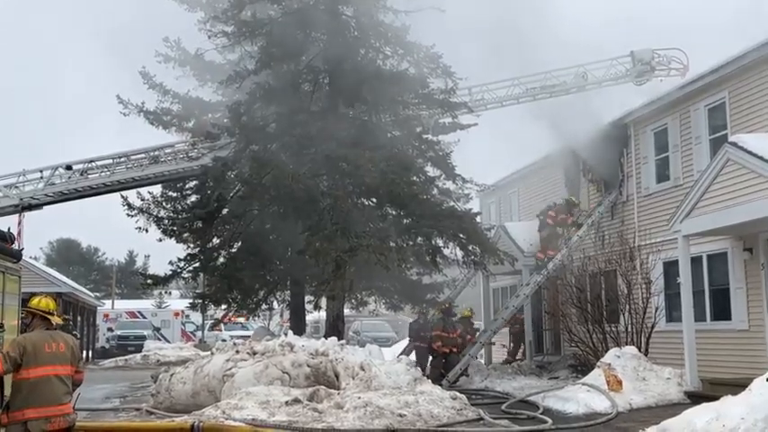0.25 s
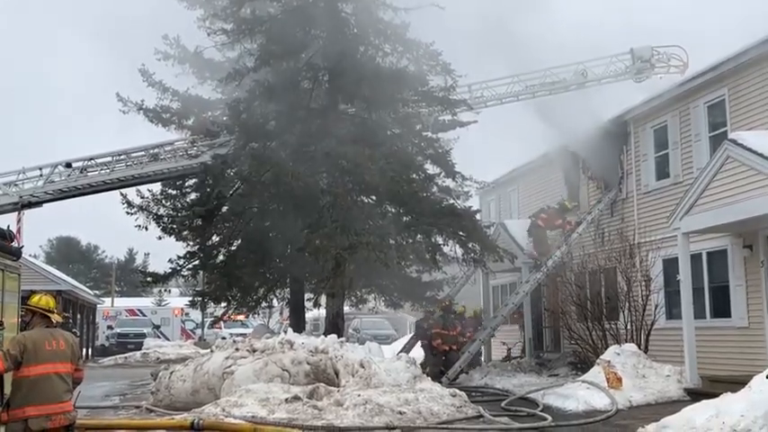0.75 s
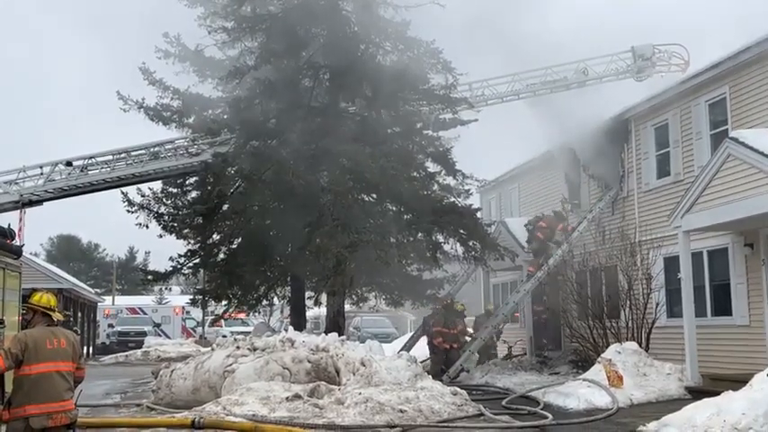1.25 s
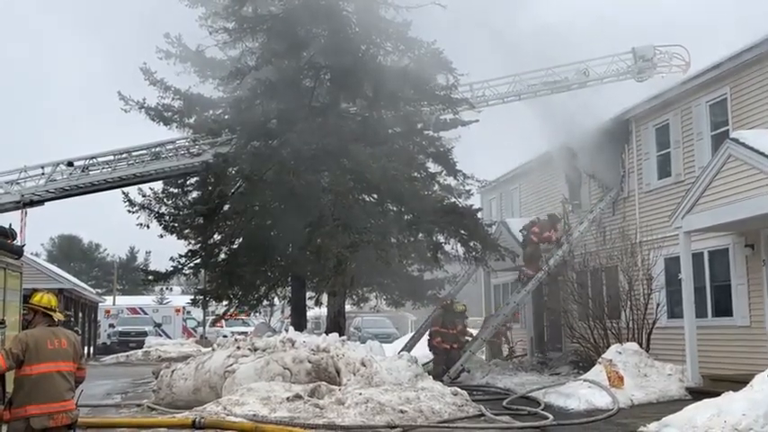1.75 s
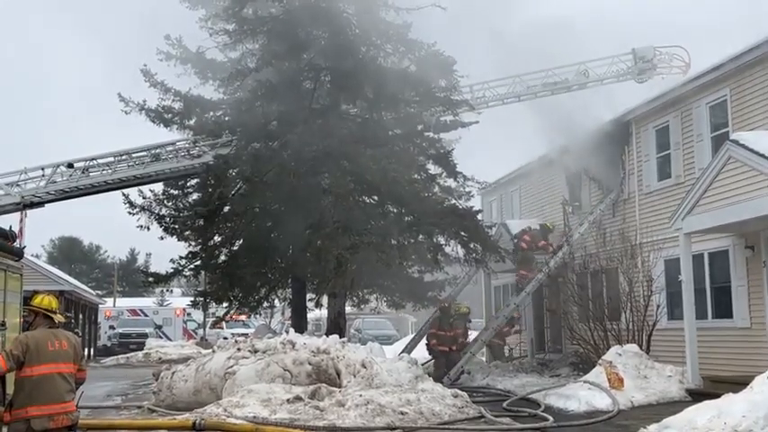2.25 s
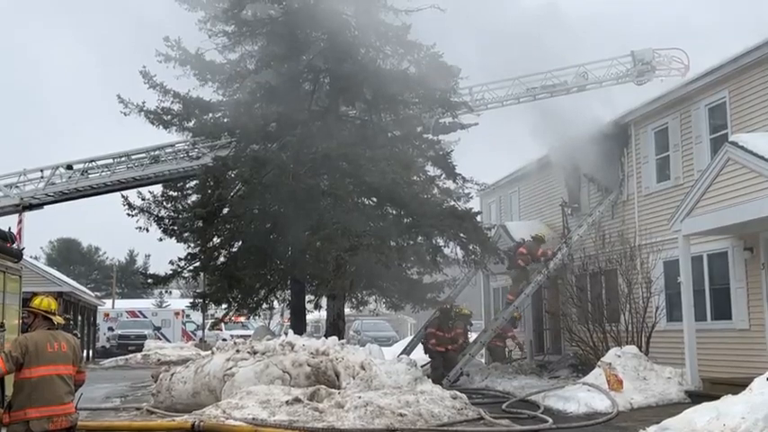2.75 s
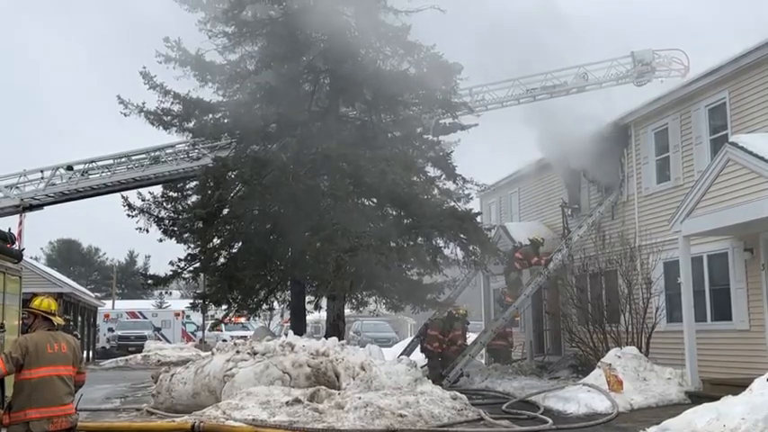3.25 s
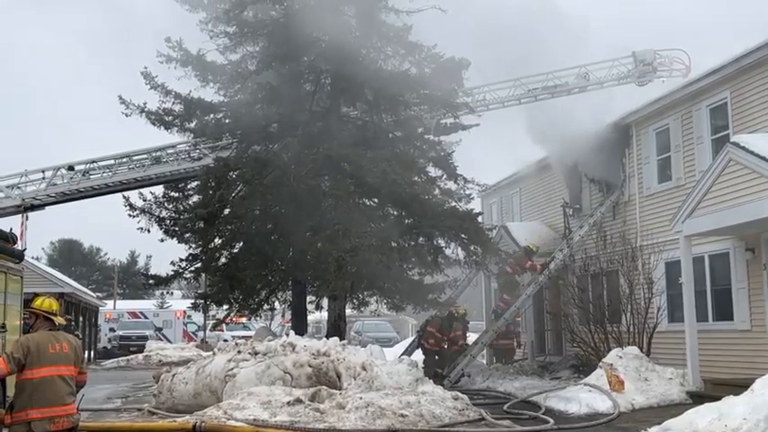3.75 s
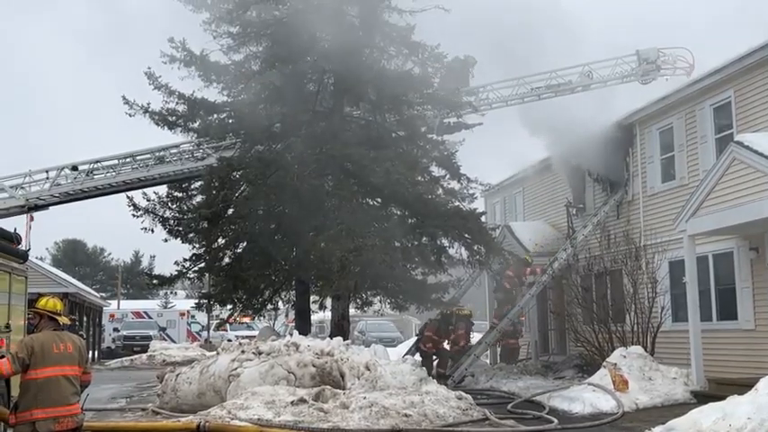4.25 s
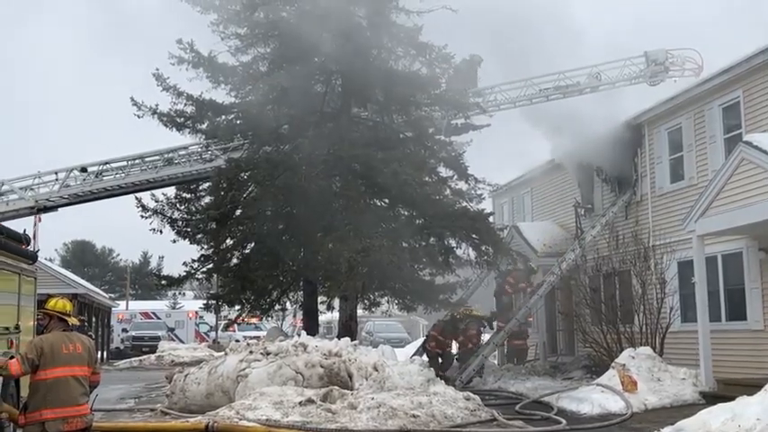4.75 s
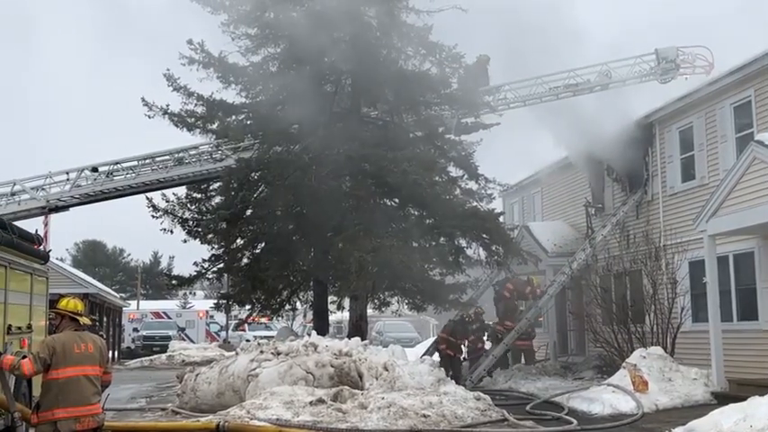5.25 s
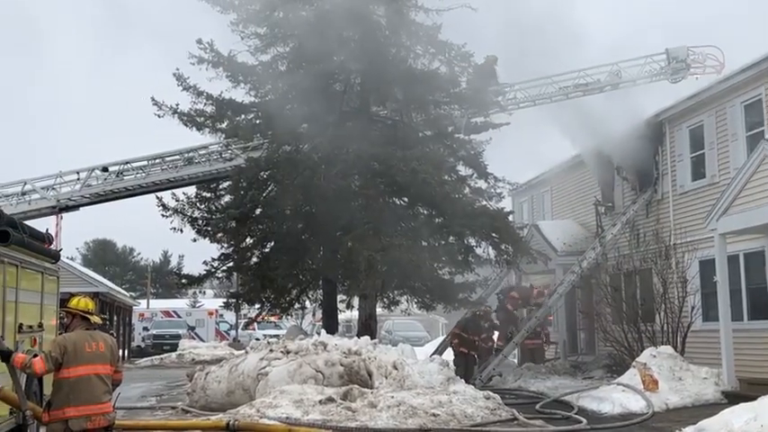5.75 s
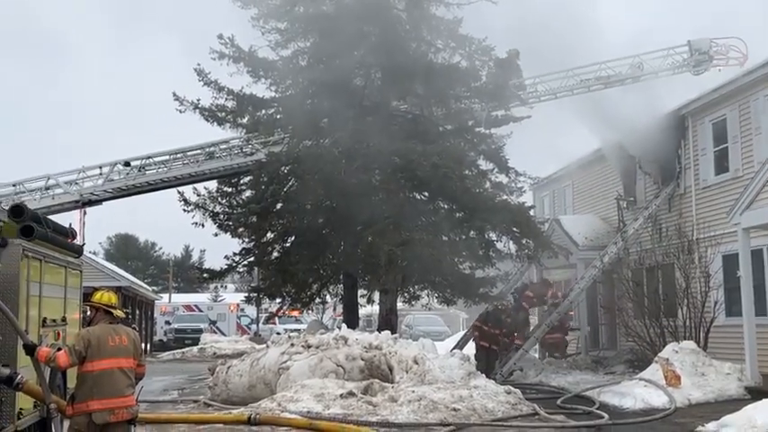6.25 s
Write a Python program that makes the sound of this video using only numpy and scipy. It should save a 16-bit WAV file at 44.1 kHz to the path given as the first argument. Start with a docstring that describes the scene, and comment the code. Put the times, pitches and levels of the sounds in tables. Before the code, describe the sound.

Outside a burning house, a nearby fire truck diesel idles with fast knocking clatter and ticking injectors while a quicker pump engine drones low. Even water hiss and deep exhaust rumble fill the background. The whole bed slowly rises, then holds. Ringing tool knocks come early, small bright ticks follow, and two water spatters land later. Open-air, fixed microphone near the engines.

```python
"""Fire engines run outside a burning house: a near six-cylinder diesel idles with combustion knock and
ticking injectors, a faster one drives the pump, two more motors drone down the street, and a fan, an
alternator and a gear hum. Machines are shaft harmonics and pulsed noise; rumble and hose hiss are shaped noise.
This bed swells evenly in dB, then holds. Early on come ringing tool knocks, with crisp ticks from there on;
later two spatters of water. These are short decaying bursts of noise at levels of their own."""
import sys
import numpy as np
from scipy import signal
from scipy.fft import rfft, irfft
from scipy.io import wavfile
from scipy.ndimage import uniform_filter1d

SR = 44100
rng = np.random.default_rng(int(sys.argv[2]) if len(sys.argv) > 2 else 0)


def waveform_to_disk(signal):
    """Save audio, clipped to [-1, 1], as 16-bit WAV at the path in sys.argv[1]."""
    frames = np.transpose(np.atleast_2d(signal))
    scaled = np.clip(frames, -1, 1) * 32767
    samples = np.round(scaled).astype(np.int16)
    wavfile.write(sys.argv[1], SR, samples)


N = 286650
T = np.arange(N) / SR  # time (s)

# shaft turns a second of the idling diesel, the pump engine and two farther motors (Hz)
IDLE_HZ, PUMP_HZ, FAR_HZ, SMALL_HZ = 12.209, 22.5, 17.235, 27.14
# blade rate of a cooling fan, and the tones of an alternator and a gear (Hz)
FAN_HZ, ALTERNATOR_HZ, GEAR_HZ = 161.1, 298.47, 592.0

# clean harmonics of each machine, before the swell: [multiple of its rate above, level/dB rms]
IDLE_HARMONICS = [(3, -69), (6, -50), (18, -48), (21, -47.5), (27, -52), (30, -59)]
PUMP_HARMONICS = [(3, -40), (4, -43), (5, -46), (6, -39), (7, -49.5), (8, -55), (28, -56), (40, -63),
                  (42, -58), (76, -53.5), (100, -54)]
FAR_HARMONICS = [(3, -61), (4, -77), (5, -56), (6, -44), (7, -46.5)]
SMALL_HARMONICS = [(2, -50), (3, -42), (4, -46)]
FAN_HARMONICS = [(1, -38.5), (2, -54)]
ALTERNATOR_HARMONICS = [(1, -44), (3, -60)]
GEAR_HARMONICS = [(1, -54)]

# relative combustion knock of the six idling cylinders, in firing order: [level/dB]
CYLINDER_KNOCKS = [2, 4, -0.5, 0.5, 1.5, -1]
# ringing of the idling engine's block and covers: [f/Hz, width/Hz, relative level/dB]
BLOCK_RESONANCES = [(641, 16, -6.5), (1155, 60, -8.5), (1448, 48, -2.5), (1536, 50, -1.5), (1752, 61, -5),
                    (2042, 39, -3.5), (2657, 25, -5), (2887, 90, -7.5), (3540, 55, -15)]

# relative spectra of the noise layers: [f/Hz, level/dB per Hz]
RUMBLE_SPECTRUM = [(20, -42), (45, -23), (62, -13), (85, -2.5), (118, -11), (150, 1.5), (175, -5.5),
                   (240, -6), (275, -12.5), (310, -8.5), (400, -17), (520, -22.5), (900, -30.5),
                   (3000, -70)]
WATER_SPECTRUM = [(200, -60), (540, -10.5), (650, -3.5), (770, -7), (1150, -1.5), (1500, 0.5), (2100, -1.5),
                  (2900, -6), (3700, -14), (4900, -21), (8500, -24.5), (11500, -33), (14000, -34.5),
                  (16000, -43)]
CLATTER_SPECTRUM = [(300, -47), (800, -10.5), (1200, -3), (1480, 0.5), (1620, -4), (1800, 1), (2800, -6.5),
                    (3700, -16), (5000, -26.5), (12000, -39)]
INJECTOR_SPECTRUM = [(2500, -58), (5000, -14.5), (5750, -2.5), (6050, -1), (6450, 0.5), (7100, -6),
                     (7800, -15.5), (9500, -23.5), (15000, -42)]
KNOCK_SPECTRUM = [(200, -23), (600, 4.5), (1000, 7.5), (1600, 7), (2000, 7), (2500, 6.5), (3200, 2.5),
                  (3600, -9), (4500, -14), (5200, -16), (9000, -24), (15000, -36)]
SPATTER_SPECTRUM = [(1000, -25), (4000, 2), (6000, 2), (9000, -1), (12000, -17), (15500, -15)]
TICK_SPECTRUM = [(4000, -30), (10000, -15), (13500, 2), (15500, -1)]
# relative strength of the gear noise harmonics along frequency: [f/Hz, level/dB]
GEARING_SPECTRUM = [(150, -28), (230, 4), (450, -0.5), (780, -4.5), (950, -13), (1500, 3), (2400, -17),
                    (3500, -36)]

# knocks of tools at the house: [t/s, level/dB, t60/s, ring f/Hz]
TOOL_KNOCKS = [(.841, -30.5, 0.39, 4377), (2.244, -27, 0.28, 3106), (2.266, -34.5, 0.51, 3080)]
# small crisp ticks close by: [t/s, level/dB, t60/s]
CRISP_TICKS = [(.843, -56, .08), (2.139, -55, .12), (2.245, -52, 0.13), (2.423, -45, 0.09),
               (2.559, -44, .085), (2.804, -49, .1), (3.71, -54, .16), (5.754, -48, .14)]
# spatters of water: [t/s, level/dB, t60/s]
WATER_SPATTERS = [(4.29, -44, 0.72), (4.671, -34.5, 0.26)]

# swell of the steady sounds: slope, time it tops out, gain from there on
RISE_DB_PER_S, FULL_AT_S, FULL_DB = 1.4364, 4.93, 1.75
# metallic ring under each crack: width (Hz), level against the crack (dB), t60 (s)
CLANK_WIDTH_HZ, CLANK_DB, CLANK_T60 = 210, -11.5, 0.15
EDGE_HZ = 15700  # top of the recorder's band


def amp(db):
    """Decibels to gain."""
    return 10 ** (np.asarray(db) / 20)


def evened(x):
    """Scales to rms 1."""
    return x / np.sqrt(np.mean(x ** 2) + 1e-20)


def noise():
    """White noise for the whole scene."""
    return rng.standard_normal(N)


def read(points, hz):
    """Reads a spectrum in dB on a log-frequency axis."""
    f, db = np.transpose(points)
    return np.interp(np.log(hz + 1), np.log(f + 1), db)


def coloured(x, points):
    """Filters x by a spectrum and scales it to rms 1."""
    gain = amp(read(points, np.fft.rfftfreq(N, 1 / SR)))
    return evened(irfft(rfft(x) * gain, N))


def wander(rate_hz):
    """Slow chance, rms 1, with changes up to about rate_hz."""
    hz = np.fft.rfftfreq(N, 1 / SR)
    lowpass = (hz > 0) / (1 + (hz / rate_hz) ** 4)
    return evened(irfft(rfft(noise()) * lowpass, N))


def shaft(hz, drift_s):
    """Turns made by a governed shaft that runs early or late by drift_s rms."""
    return hz * (T + drift_s * wander(0.28))


def burst(turns, start, length):
    """Envelope of a quick rise and slower fall, once a turn; start and length are parts of a turn."""
    age = ((turns - start) % 1) / length
    return age * np.exp(1 - age)


def hum(turns, harmonics, waver_db):
    """Harmonics of a shaft; moving air makes each waver on its own."""
    out = np.zeros(N)
    for order, db in harmonics:
        level = amp(db + waver_db * wander(2))
        phase = 2 * np.pi * (order * turns + rng.random())
        out += level * np.sqrt(2) * np.cos(phase)
    return out


def ringing(x, modes):
    """Passes x through a set of resonances, at rms 1."""
    hz = np.fft.rfftfreq(N, 1 / SR)
    response = sum(amp(db) / (1 + 2j * (hz - f) / width) ** 2 for f, width, db in modes)
    return evened(irfft(rfft(x) * response, N))


def street(x, echo_db=-7, latest_s=0.03, count=14):
    """Early reflections from trucks and walls ripple the spectrum; the mix is scaled to rms 1."""
    delays = rng.uniform(0.002, latest_s, count)
    signs = rng.choice([-1, 1], count)
    echoes = sum(sign * np.roll(x, round(s * SR)) for s, sign in zip(delays, signs))
    return evened(x + amp(echo_db) * echoes / np.sqrt(count))


def idling_diesel(clatter_db=-38, block_db=-40.5, injector_db=-42.0):
    """Six cylinders fire three times a turn; each firing knocks the block and the injectors tick twice."""
    turns = shaft(IDLE_HZ, drift_s=0.00017)
    firings = 3 * turns
    knock_start = 0.5  # part of a firing
    cylinder = np.floor(firings - knock_start).astype(int) % len(CYLINDER_KNOCKS)
    knocks = amp(CYLINDER_KNOCKS)[cylinder] * burst(firings, knock_start, length=0.25)
    clatter = amp(clatter_db) * street(coloured(knocks * noise(), CLATTER_SPECTRUM))
    block = amp(block_db) * ringing(knocks * noise(), BLOCK_RESONANCES)

    main_tick = burst(firings, start=0.78, length=0.061) ** 2
    second_tick = burst(firings, start=0.19, length=0.093) ** 2
    # powers add; a steady sizzle of 0.62 fills the gaps between ticks
    ticks = np.sqrt(main_tick + 0.52 * second_tick + 0.62)
    sizzle = coloured(ticks * noise(), INJECTOR_SPECTRUM)
    injectors = amp(injector_db) * street(sizzle, echo_db=-10.5)
    return hum(turns, IDLE_HARMONICS, waver_db=1.5) + clatter + block + injectors


def pump_engine(gearing_db=-43, count=150):
    """A faster diesel: strong low orders, and gear noise that repeats with every turn."""
    turns = shaft(PUMP_HZ, drift_s=0.00003)
    orders = np.arange(count)
    random_phases = np.exp(2j * np.pi * rng.random(count))
    one_turn = irfft(amp(read(GEARING_SPECTRUM, orders * PUMP_HZ)) * random_phases, 4096)
    gearing = np.interp(turns, np.arange(len(one_turn)) / len(one_turn), one_turn, period=1)
    return hum(turns, PUMP_HARMONICS, waver_db=1.0) + amp(gearing_db) * evened(gearing)


def other_machines():
    """Farther motors, a fan, an alternator and a gear, each a hum on a drifting shaft of its own."""
    machines = [(FAR_HZ, FAR_HARMONICS), (SMALL_HZ, SMALL_HARMONICS), (FAN_HZ, FAN_HARMONICS),
                (ALTERNATOR_HZ, ALTERNATOR_HARMONICS), (GEAR_HZ, GEAR_HARMONICS)]
    return sum(hum(shaft(hz, drift_s=0.00016), harmonics, waver_db=0.44) for hz, harmonics in machines)


def water(level_db=-32.0, patchy_db=0.72, swell_db=0.03):
    """Distant spray: a dense hiss with brief patches where the jet breaks up."""
    bins = signal.stft(noise(), nperseg=512)[2]
    patches = rng.standard_normal(bins.shape)
    patches = uniform_filter1d(patches, size=14, axis=0)  # smooth along frequency
    patches = evened(uniform_filter1d(patches, size=9, axis=1))  # smooth along time
    spray = signal.istft(bins * amp(patchy_db * patches), nperseg=512)[1][:N]
    return amp(level_db + swell_db * wander(2.6)) * coloured(spray, WATER_SPECTRUM)


def rumble(level_db=-29.0, surge_db=0.5):
    """Turbulent exhaust and cooling air: low noise whose level surges gently."""
    return amp(level_db + surge_db * wander(8.1)) * coloured(noise(), RUMBLE_SPECTRUM)


def swell():
    """Gain of the steady sounds: an even rise in dB, then a hold."""
    return amp(FULL_DB - RISE_DB_PER_S * np.maximum(FULL_AT_S - T, 0))


def decays(rows, rise_s):
    """Envelope of short bursts that rise quickly and die away exponentially."""
    envelope = np.zeros(N)
    for s, db, t60 in rows:
        age = np.maximum(T - s, 0)
        rise = 1 - np.exp(-age / rise_s)
        envelope += amp(db) * rise * np.exp(-np.log(1000) * age / t60)
    return envelope


def tool_knocks():
    """Each blow is a broad crack with a short metallic ring."""
    cracks = [row[:3] for row in TOOL_KNOCKS]
    out = decays(cracks, rise_s=0.0012) * coloured(noise(), KNOCK_SPECTRUM)
    blow = noise()
    for s, db, _, ring_hz in TOOL_KNOCKS:
        ring = ringing(blow, [(ring_hz, CLANK_WIDTH_HZ, 0)])
        out += decays([(s, db + CLANK_DB, CLANK_T60)], rise_s=0.002) * ring
    return out


def crisp_ticks():
    """Tiny bright bursts of noise close by."""
    return decays(CRISP_TICKS, rise_s=0.002) * coloured(noise(), TICK_SPECTRUM)


def spatters(drops_per_s=1500, wash=0.6):
    """Water lands in quick showers of separate drops over a fine wash."""
    drops = evened(noise() * (rng.random(N) < drops_per_s / SR))
    shower = coloured(drops + wash * noise(), SPATTER_SPECTRUM)
    return decays(WATER_SPATTERS, rise_s=0.0067) * shower


def scene():
    """Machines, water and rumble swell together; the small events sit on top."""
    steady = idling_diesel() + pump_engine() + other_machines() + water() + rumble()
    return (steady * swell() + tool_knocks() + crisp_ticks() + spatters())[None]


def record(dry):
    """The recorder's band limit: a steep linear-phase low-pass."""
    lowpass = signal.firwin(601, EDGE_HZ, window=("kaiser", 9), fs=SR)
    return signal.oaconvolve(dry, lowpass[None], "same")


dry = scene()
out = record(dry)
waveform_to_disk(out)
```